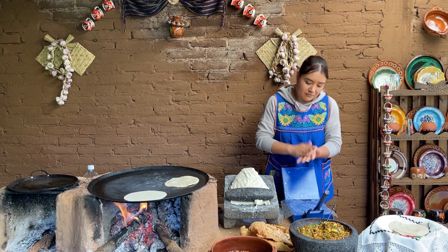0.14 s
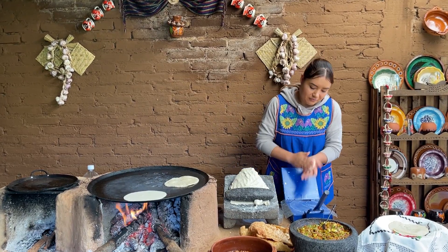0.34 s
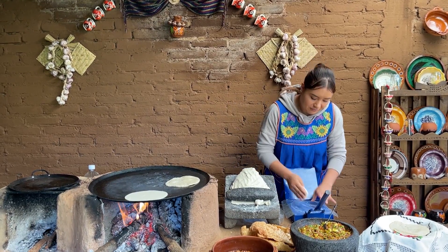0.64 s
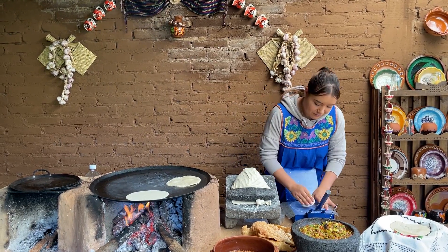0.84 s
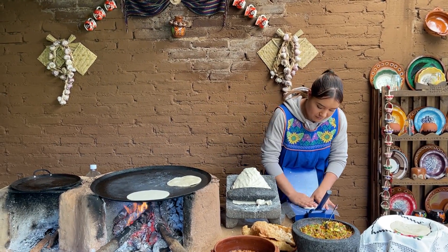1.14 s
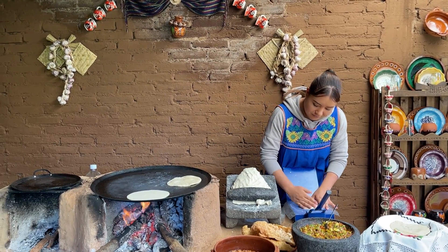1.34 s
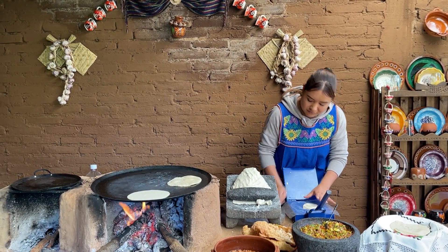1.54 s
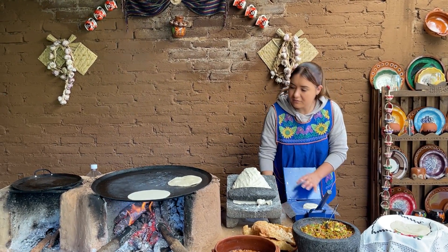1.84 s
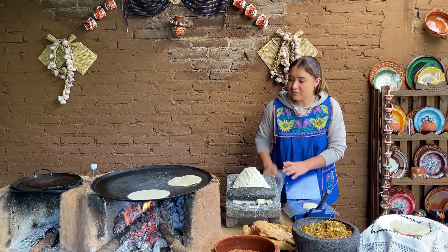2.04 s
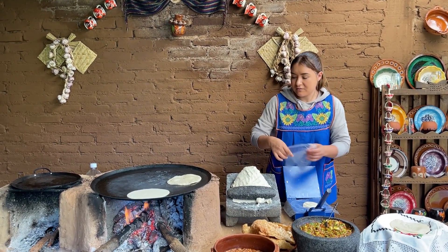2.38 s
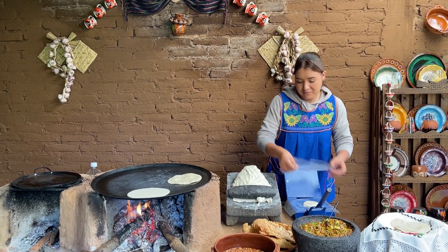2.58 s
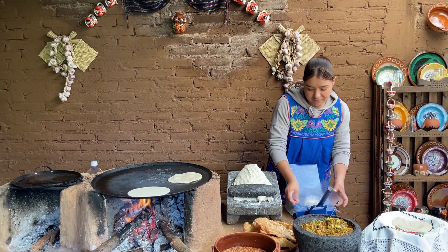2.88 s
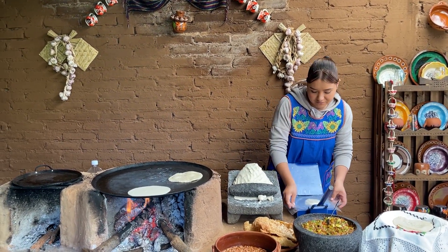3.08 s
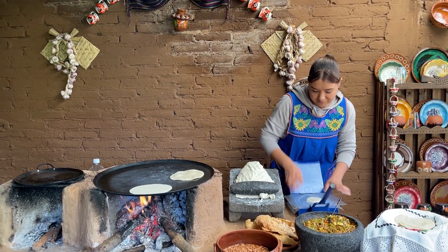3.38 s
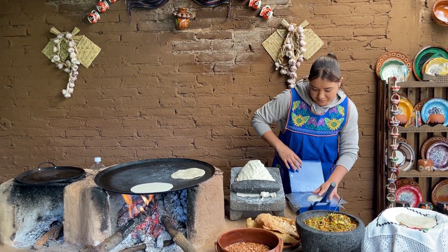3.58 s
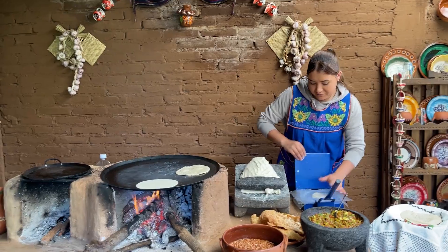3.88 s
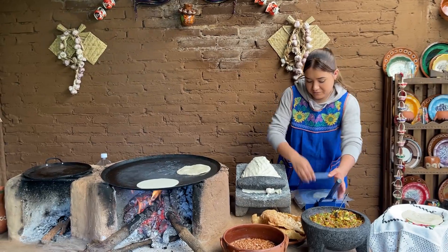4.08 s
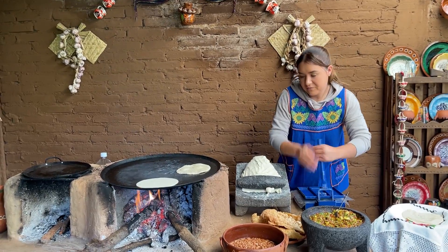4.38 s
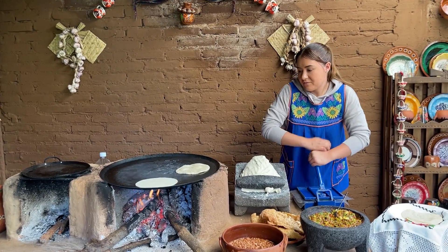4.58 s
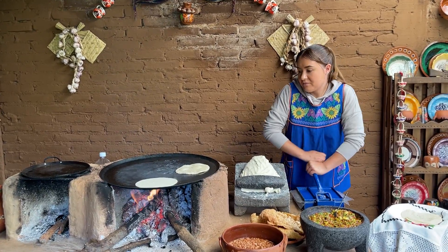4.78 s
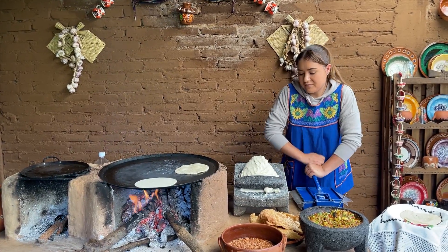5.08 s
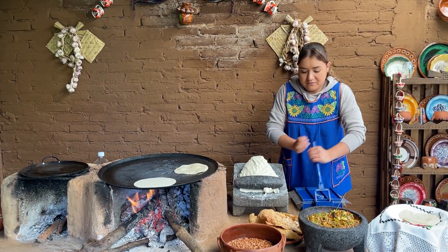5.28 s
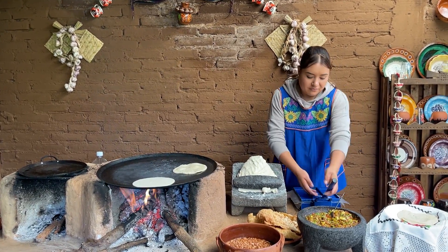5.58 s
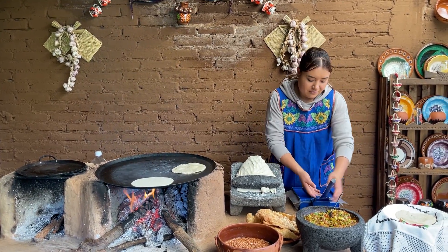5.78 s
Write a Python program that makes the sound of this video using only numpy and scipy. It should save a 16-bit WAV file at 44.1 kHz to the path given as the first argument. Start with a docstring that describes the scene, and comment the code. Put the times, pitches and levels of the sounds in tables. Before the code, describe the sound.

A close microphone in a brick kitchen with short, dense echoes; a very quiet, low fluttering wash of fire and open air runs throughout. At 0.02 s a sharp, loud palm crack on dough, then weaker pats at 0.2 and 0.38, the last duller. A faint buzzy, gliding bird call comes at 0.5, mostly as echo, returning at 3.3, 3.9 and very faintly 5.7. Soft plastic touches at 0.6 and 1.4 surround a short metal clack with small knocks at 1.2-1.3. From 1.75 to 2.9 thin plastic peels, crinkles and wafts, snapping hardest around 2.4; small rustles follow to 3.15, then near quiet. Metal lid and hinge clacks begin at 3.8, thickening from 4.2 to a bright, hard lever clack at 4.53. Dull table rubs and bumps follow, with a thump at 5.15, knocks from 5.2, brighter clacks at 5.6, and a last soft knock at 5.85 with faint plastic rustling.

```python
"""A metal tortilla press clacks in a brick kitchen, each blow a contact tick and decaying modes of the casting.
Before it, a ball of dough is patted three times: shaped clicks for the air cracking out, with a soft thump.
A plastic sheet is peeled and shaken, as clumped buckling clicks, snaps and wafted air; the press rubs the table.
A fire murmurs as low fluttering noise, and a small bird calls in buzzy gliding tones.
Hands, press, sheet and bird also excite dense wall reflections."""
import sys
import numpy as np
from scipy import signal
from scipy.fft import rfft, irfft
from scipy.io import wavfile
from scipy.ndimage import uniform_filter1d

SR = 44100
rng = np.random.default_rng(int(sys.argv[2]) if len(sys.argv) > 2 else 0)


def digitize_waveform(pressure):
    """Quantize a signal to 16-bit integers and store it at the path in sys.argv[1].

    Rows of a 2-D input are taken as channels; values are limited to [-1, 1].
    """
    field = np.atleast_2d(pressure).T
    bounded = np.clip(field, -1, 1)
    quanta = np.round(bounded * 32767).astype(np.int16)
    wavfile.write(sys.argv[1], SR, quanta)


N = 261513  # length in samples
T = np.arange(N) / SR  # time in seconds


def amp(db):
    """Logarithmic level: converts decibels to linear gain."""
    return 10 ** (np.asarray(db) / 20)


def evened(x):
    """Mean power: scales a signal to rms 1."""
    return x / np.sqrt(np.mean(x ** 2) + 1e-20)


def struck(rows):
    """Onset strength: scales each row to unit deviation over its first 25 ms."""
    return rows / np.std(rows[:, :SR // 40], axis=1, keepdims=True)


def read(points, hz):
    """Logarithmic pitch: interpolates a table on a log-frequency axis."""
    f, value = np.transpose(points)
    return np.interp(np.log(hz + 1), np.log(f + 1), value)


def add(mix, s, sound):
    """Superposition: sums a sound into the mix at time s, in place."""
    part = mix[max(round(s * SR), 0):][:len(sound)]
    part += sound[:len(part)]


def impulse(spectrum, tilt_db=0, size=2048):
    """Minimum phase: a causal click with the given spectrum, tilted in dB per octave."""
    hz = abs(np.fft.fftfreq(size, 1 / SR))
    tilt = tilt_db * np.log2(hz / 2000 + .02)
    log_gain = np.log(amp(read(spectrum, hz) + tilt))
    # the Hilbert transform of the log gain supplies the phase
    response = np.exp(np.conj(signal.hilbert(log_gain)))
    return np.fft.ifft(response).real


def colour(x, spectrum):
    """Linear filtering: convolves a signal with the click of a spectrum."""
    return signal.oaconvolve(x, impulse(spectrum))[:len(x)]


def band(x, lo_hz, hi_hz):
    """Band limitation: a causal Butterworth band-pass."""
    edges = [lo_hz, min(hi_hz, SR / 2 - 1)]
    return signal.sosfilt(signal.butter(4, edges, "band", fs=SR, output="sos"), x)


def drift(per_s):
    """Random modulation: joins unit-size normal draws, per_s of them each second, by straight lines."""
    knots = rng.standard_normal(N // 100)
    return np.interp(T * per_s, np.arange(len(knots)), knots)


def strokes(rows, attack_s, release_s):
    """Amplitude envelope: the gain of hand strokes that swell, hold and let go."""
    out = np.zeros(N)
    for s, length, db in rows:
        swell, let_go = (T - s) / attack_s, (s + length - T) / release_s
        out += amp(db) * np.clip(np.minimum(swell, let_go), 0, 1)
    return out


# Spectrum of the fire and open air. Each row: frequency in Hz, relative level in dB.
HEARTH_SPECTRUM = [(15, -51), (25, -16.5), (32, -20.5), (50, -7), (107, -4), (137, -8), (235, -11),
                   (261, -12), (449, -13.5), (572, -15.5), (881, -15), (2090, -34.5), (4950, -39.5),
                   (13400, -45.5), (15800, -44)]


def hearth(level_db=-60.5, flutter_db=0.74):
    """Broadband turbulence: the low, gently fluttering wash of the fire and the open air."""
    gain = amp(read(HEARTH_SPECTRUM, np.fft.rfftfreq(N, 1 / SR)))
    wash = irfft(rfft(rng.standard_normal(N)) * gain, N)
    return amp(level_db) * evened(wash * amp(flutter_db * drift(10)))


# Pats on the dough. Each row: start in seconds, peak level of the crack in dB, brightness in dB per octave,
# lag of the second contact in ms, share of the crack in the second contact.
DOUGH_PATS = [(0.0231, -3.5, -1.5, 0.4, 0.56), (0.1993, -16, 0, 1, 0.57), (.376, -22, -4.5, .4, 0.13)]
# Spectrum of air cracking out under the palm. Each row: frequency in Hz, relative level in dB.
PALM_SPECTRUM = [(100, -31), (350, -22), (800, -3.5), (1400, -7), (2000, 0), (3200, -4), (4400, 0),
                 (5800, -10.5), (7500, -19), (10000, -26.5), (16000, -47)]


def pats(spread_hz=3000, spread_radius=.95, thump_db=-25, thump_hz=480):
    """Impulsive air release between palm and dough; returns the first contacts and the rest of each pat."""
    first, rest = np.zeros(N), np.zeros(N)
    # all-pass resonance: the cupped palm draws the crack out over a few swings
    hollow = [1, -2 * spread_radius * np.cos(2 * np.pi * spread_hz / SR), spread_radius ** 2]
    t = np.arange(SR // 50) / SR
    thump = np.sin(2 * np.pi * thump_hz * t) * np.exp(-t / 0.00053)  # the soft dough gives way
    for s, db, bright_db, lag_ms, share in DOUGH_PATS:
        crack = signal.lfilter(hollow[::-1], hollow, impulse(PALM_SPECTRUM, bright_db))
        crack *= amp(db) / abs(crack).max()
        add(first, s, crack)
        add(rest, s + lag_ms / 1000, share * crack)
        add(rest, s, amp(thump_db + db / 2) * thump)
    return first, rest


# Reverberation of the brick room. Each row: frequency in Hz, time to fall 60 dB in seconds.
ROOM_DECAY = [(100, 0.88), (500, 0.26), (2500, 0.27), (5000, 0.21), (9000, .25), (16000, .15)]


def room(x, first_s=.004):
    """Reverberant decay: dense random reflections from brick, the treble generally dying sooner than the bass."""
    taps = rng.standard_normal(SR) * (rng.random(SR) < .15)
    hz, t, bins = signal.stft(taps, SR, nperseg=256)
    decay = amp(-60 * t / read(ROOM_DECAY, hz)[:, None])
    tail = signal.istft(bins * decay, SR, nperseg=256)[1]
    tail = np.concatenate([np.zeros(int(first_s * SR)), tail])
    return signal.fftconvolve(x, tail / np.linalg.norm(tail))[:N]


# Bird calls. Each row: start in seconds, level in dB before the direct and echo gains.
BIRD_CALLS = [(0.482, -55.5), (3.29, -54.5), (3.865, -59), (5.667, -62)]
# Notes of one call. Each row: offset from the call's start in seconds, length in seconds,
# starting pitch in Hz before scatter, final pitch in Hz, relative level in dB, buzz depth in Hz.
CALL_NOTES = [(-.005, 0.055, 5520, 5100, -8, 96), (-.01, 0.062, 4970, 4000, -5, 475),
              (.075, 0.0354, 3457, 4160, -5.5, 446), (.1, 0.035, 4900, 4200, -10.5, 470)]


def bird(direct_db=-18, echo_db=-3, scatter=0.0262):
    """Frequency modulation: a high whistle and three buzzy slurs, heard mostly as echo off the walls."""
    out = np.zeros(N)
    for s, db in BIRD_CALLS:
        for after, length, from_hz, to_hz, note_db, buzz_hz in CALL_NOTES:
            start_hz = from_hz * (1 + scatter * rng.uniform(-1.01, 1))
            glide = np.linspace(start_hz, to_hz, int(length * SR))
            buzz = evened(uniform_filter1d(rng.standard_normal(SR // 4), size=40))
            hz = glide + buzz_hz * buzz[:len(glide)]
            tone = np.sin(2 * np.pi * np.cumsum(hz) / SR)
            add(out, s + after, amp(db + note_db) * signal.windows.tukey(len(hz), .5) * tone)
    return amp(direct_db) * out + amp(echo_db) * room(out)


def crinkle(count=16):
    """Buckling: tiny creases ring a few cycles in clumps at many pitches, over the hiss of sliding film."""
    out = np.zeros(N)
    for hz in np.geomspace(1400, 13000, count):
        at = np.flatnonzero(rng.random(N) < 150 / SR)  # about 150 creases a second at each pitch
        size_db = 4.5 * np.minimum(rng.exponential(1, len(at)), 3.5)
        clicks = np.zeros(N)
        clicks[at] = amp(size_db + 2 * drift(18)[at])
        out += signal.lfilter(*signal.iirpeak(hz, 7, fs=SR), clicks)
    hiss = .45 * rng.standard_normal(N)
    return (evened(out) + hiss) * amp(1.8 * drift(60))


def crackles(per_s=110, spread_db=5):
    """Random impulses: sparse creases that stand out of the rustle, each a brief burst."""
    size = amp(spread_db * np.minimum(rng.exponential(1, N), 2.5))
    size *= rng.random(N) < per_s / SR
    burst = np.exp(-np.arange(SR // 100) / SR / 0.00094)
    return evened(signal.oaconvolve(size, burst)[:N] * rng.standard_normal(N))


# Spectrum of the crinkling sheet. Each row: frequency in Hz, relative level in dB.
SHEET_SPECTRUM = [(710, -67), (1200, -5), (1480, -9.5), (1610, -6), (1870, -7), (2600, -5.5), (3270, -6),
                  (5380, -14.5), (10700, -39), (15000, -39)]
# Spectrum of film peeling off dough. Each row: frequency in Hz, relative level in dB.
FILM_SPECTRUM = [(1500, -9), (4000, 3), (6500, 4.5), (8500, -7), (12000, -14), (16000, -16)]
# Briskness of the sheet as it is peeled off, lifted and shaken out.
# Each row: time in seconds, level in dB before the rustle gain.
MOTION_CURVE = [(1.72, -79), (1.8, -66.5), (2.02, -64.5), (2.14, -65.5), (2.27, -62), (2.46, -60),
                (2.6, -62.5), (2.72, -74.5), (2.95, -70.5)]
# Brief touches of the sheet. Each row: start in seconds, length in seconds, level in dB before the rustle gain.
SHEET_TOUCHES = [(.63, .2, -73.5), (1.13, .04, -76), (1.38, .1, -71.5), (2.99, 0.045, -65.5),
                 (3.06, 0.061, -64), (3.47, 0.33, -79), (4.82, .22, -77.5), (5.75, 0.21, -71)]
# Tugs that peel the film. Each row: start in seconds, length in seconds, level in dB before the peel gain.
PEEL_TUGS = [(1.78, 0.082, -67.5), (1.93, 0.18, -74), (2.22, .1, -65.5)]
# Creases that snap. Each row: time in seconds, level in dB before the snap and surge gains.
CREASE_SNAPS = [(1.5892, -65), (1.7434, -59.5), (1.9216, -46.5), (1.9451, -47.5), (2.167, -47),
                (2.2292, -44), (2.3737, -39), (2.4492, -38), (2.4857, -48), (2.574, -45), (2.6784, -46),
                (2.7625, -56), (2.8718, -55), (3.073, -55), (3.1228, -53.5)]


def plastic(rustle_db=-2, peel_db=-1, snap_db=-9, flap_db=-14, waft_db=-54, waft_power=2.85,
            crackle_db=-4, surge_db=-14, surge_s=0.013, snap_s=0.0026):
    """Snap-through buckling: the sheet peels, flaps and crinkles, creases snap, and brisk motion wafts air."""
    drive = evened(crinkle() + amp(crackle_db) * crackles())
    when, motion_db = np.transpose(MOTION_CURVE)
    motion = np.interp(T, when, amp(motion_db), left=0, right=0)
    # each snap sets off a dying surge of small creases
    surges = np.zeros(N)
    for s, db in CREASE_SNAPS:
        surges += amp(db + surge_db) * (T > s) * np.exp(-abs(T - s) / surge_s)
    rustle = motion + surges + strokes(SHEET_TOUCHES, attack_s=0.01, release_s=0.018)
    flap = evened(band(rng.standard_normal(N), 391, 1700))
    out = amp(rustle_db) * rustle * (evened(colour(drive, SHEET_SPECTRUM)) + amp(flap_db) * flap)

    tugs = strokes(PEEL_TUGS, attack_s=0.01, release_s=0.054)
    out += amp(peel_db) * tugs * evened(colour(drive, FILM_SPECTRUM))

    waft = evened(band(rng.standard_normal(N), 75, 870) * amp(4.4 * drift(50)))
    out += amp(waft_db) * (motion / motion.max()) ** waft_power * waft

    t = np.arange(SR // 30) / SR
    for s, db in CREASE_SNAPS:
        snap = colour(rng.standard_normal(len(t)) * np.exp(-t / snap_s), SHEET_SPECTRUM)
        add(out, s, amp(db + snap_db) * snap / np.std(snap[:SR // 250]))
    return out


# Blows on the press. Each row: start in seconds, relative level in dB, hardness (treble over body) in dB,
# ring time factor (held to at least .45), part struck.
PRESS_BLOWS = [(1.199, -32, 1.5, 0.64, "plate"), (1.224, -45, -23, .9, "plate"),
               (1.254, -42.5, -14, 1, "plate"), (1.275, -48.5, -6.5, 0.52, "plate"),
               (3.828, -41.5, -4.5, 0.87, "lid"), (3.943, -45, -16, 1, "lid"),
               (3.992, -39.5, -12, .9, "hinge"), (4.003, -35.5, -2, 1, "lid"),
               (4.114, -46.5, -27, 0.88, "hinge"), (4.216, -40.5, -17, 0.62, "hinge"),
               (4.235, -43, -16.5, 1, "hinge"), (4.3, -45.5, -27.5, 1, "hinge"),
               (4.349, -37.5, -10.5, 1, "lid"), (4.376, -39, -9.5, 0.96, "lid"),
               (4.394, -33, -0.5, 0.62, "lid"), (4.402, -40, 5, 0.61, "hinge"),
               (4.429, -41.5, -15, 1, "lever"), (4.525, -38, 10, 0.87, "plate"),
               (4.533, -27, 1, 0.55, "lever"), (4.543, -39.5, -9, 0.36, "lever"),
               (5.226, -45.5, -2, 0.32, "plate"), (5.235, -38, -17, 0.97, "hinge"),
               (5.25, -47, 4.5, 1, "lever"), (5.414, -45, -26, 0.63, "lid"),
               (5.424, -45.5, -26, 0.75, "lever"), (5.478, -40.5, 7, 1, "lever"),
               (5.612, -34.5, -4, 0.91, "lever"), (5.635, -33, 5.5, 0.6, "lever"),
               (5.845, -39, -16, 0.57, "hinge")]
# Ringing modes of the casting. Each row: frequency in Hz, relative level in dB before random variation,
# time to fall 60 dB in seconds before the ring time factor.
PRESS_MODES = [(381, 2.5, 0.2), (436, 0.5, 0.02), (520, -5, 0.02), (574, 5.5, 0.058), (673, -5, 0.12),
               (813, 2, 0.065), (810, -1, 0.031), (966, 0, 0.11), (1148, -9, 0.12), (1314, -2.5, 0.11),
               (1365, 14.5, 0.014), (1800, -2, 0.12), (2130, 2.5, 0.023), (2280, -26, 0.047),
               (2460, -17, 0.037), (2610, -44, .04), (3210, -37, 0.03), (3800, -24, 0.071),
               (4290, -9, 0.038), (5486, -9.5, 0.029), (6400, -18, 0.03)]
# Spectrum of the dense modes. Each row: frequency in Hz, relative level in dB.
CLATTER_SPECTRUM = [(60, -8), (180, 0.5), (280, -7), (400, 17), (1250, 4), (1700, 1.5), (2400, -0.5),
                    (3500, -2), (5200, -12), (7000, -23), (10000, -33.5), (16000, -47)]
# Favoured modes of each press part. Each entry: body in Hz, clang in Hz, clink in Hz,
# lowest body frequency in Hz, thud offset in dB, clang offset in dB.
PRESS_PARTS = {"plate": (645, 1293, 2680, 502, 6.1, 1.1), "lid": (527, 1373, 1889, 417, -5, -1.5),
               "hinge": (406.5, 864, 3000, 369, 1.5, 0), "lever": (380, 1095, 2190, 333, -7, -0.5)}


def press(clatter_db=0, clatter_t60=0.074, spot_db=0, thud_db=-17, body_db=-5, clang_db=-5.5, clink_db=-9,
          tick_db=4, rise_s=0.0016, clang_share=0.38):
    """Modal vibration: a tick excites the casting's modes and a short dense clatter, brighter for hard blows."""
    out, t = np.zeros(N), np.arange(SR // 6) / SR
    # columns shaped to act on one row of samples per blow
    s, level, hardness, ring = np.transpose([row[:-1] for row in PRESS_BLOWS])[:, :, None]
    parts = np.transpose([PRESS_PARTS[row[-1]] for row in PRESS_BLOWS])[:, :, None]
    *favoured, lowest_hz, part_thud_db, part_clang_db = parts
    hz, mode_db, t60 = np.transpose(PRESS_MODES)[:, :, None]
    ring = np.maximum(ring, .45)
    contact = np.tanh(t / .0006) ** 2  # smooth onset

    blows = []
    for r in ring:
        phase, size_db = rng.random(hz.shape), rng.normal(0, 3, hz.shape)
        decay = amp(mode_db + size_db - 60 * t / (t60 * r))
        modes = contact * (decay * np.sin(2 * np.pi * (hz * t + phase))).sum(0)
        noise = rng.standard_normal(len(t)) * amp(-60 * t / (clatter_t60 * r))
        clatter = colour(noise, CLATTER_SPECTRUM)
        blows.append(evened(modes) + amp(clatter_db) * evened(clatter))
    blows = np.array(blows)
    soft = blows * (1 - np.exp(-t / rise_s))  # the heavy parts take a moment to move

    # one favoured tone of the struck part for each of body, clang and clink
    fade = amp(-60 * t / (.055 * ring))
    spot = [amp(spot_db) * struck(contact * np.sin(2 * np.pi * f * t) * fade) for f in favoured]

    thud = struck(band(soft, 70, 296))
    body = np.array([band(blow, lo_hz, 759) for blow, lo_hz in zip(soft, lowest_hz[:, 0])])
    body = struck(struck(body) + 0.84 * spot[0])
    clang = struck(struck(band(soft, 850, 1457)) + .8 * spot[1])
    clink = struck(struck(band(blows, 2050, 14000)) + .35 * spot[2])
    sounds = amp(thud_db + part_thud_db) * thud
    sounds += amp(body_db) * body
    sounds += amp(clang_db + part_clang_db + clang_share * hardness) * clang
    sounds += amp(clink_db + hardness) * clink

    tick = impulse(CLATTER_SPECTRUM)
    tick /= abs(tick).max()
    for at, db, sound in zip(s[:, 0], (level + hardness)[:, 0], amp(level) * sounds):
        add(out, at, sound)
        add(out, at + .001, amp(db + tick_db) * tick)
    return out


# Rubs of the loaded press on the table. Each row: start in seconds, length in seconds, level in dB before the rub gain.
TABLE_RUBS = [(4.03, 0.28, -51), (4.6, 0.21, -57.5), (4.82, 0.253, -57), (5.4, 0.28, -49),
              (5.64, 0.37, -55.5)]
# Spectrum of the rubbed table. Each row: frequency in Hz, relative level in dB.
TABLE_SPECTRUM = [(50, -2), (130, 7.5), (250, 5), (390, 8.5), (600, 1), (1100, -7), (1800, -12.5),
                  (4000, -22.5), (9000, -41)]
# Dull bumps of the table under the lever. Each row: start in seconds, level in dB, frequency in Hz, length in seconds.
TABLE_BUMPS = [(4.134, -41.5, 165, 0.016), (4.21, -36, 166.6, 0.015), (4.232, -45, 162, 0.025),
               (4.995, -44, 200, 0.015), (5.155, -32, 226, 0.0074), (5.542, -38.5, 149, 0.014)]


def table(rub_db=-3, lumpy_db=3):
    """Friction and impact: lumpy noise as the loaded press rubs the table, brief low tones as it bumps."""
    rub = evened(colour(rng.standard_normal(N) * amp(lumpy_db * drift(70)), TABLE_SPECTRUM))
    out = amp(rub_db) * strokes(TABLE_RUBS, attack_s=0.07, release_s=0.021) * rub
    for s, db, hz, length in TABLE_BUMPS:
        t = np.arange(int(length * SR)) / SR
        add(out, s, amp(db) * np.hanning(len(t)) * np.sin(2 * np.pi * hz * t))
    return out


# The hands shade the room from the cracks' treble. Each row: frequency in Hz, relative level in dB.
HAND_SHADE = [(100, 10), (2200, -8), (4500, -11.5), (9000, -11), (16000, -1.5)]


def scene(pat_room_db=-11, press_room_db=-13, sheet_room_db=-10):
    """Direct and reverberant fields: hands, press and sheet near the microphone; fire and bird behind."""
    wash = hearth()
    cracks, palms = pats()
    call = bird()
    sheet = plastic()
    metal = press() + table()
    to_room = amp(pat_room_db) * colour(cracks, HAND_SHADE)
    to_room += amp(press_room_db) * metal + amp(sheet_room_db) * sheet
    return (cracks + palms + metal + sheet + room(to_room) + call + wash)[None]


def record(dry, edge_hz=15900):
    """Band limitation: the recorder's linear-phase low-pass."""
    low_pass = signal.firwin(511, edge_hz, window=("kaiser", 9), fs=SR)
    return signal.oaconvolve(dry, low_pass[None], "same")


dry = scene()
out = record(dry)
digitize_waveform(out)
```